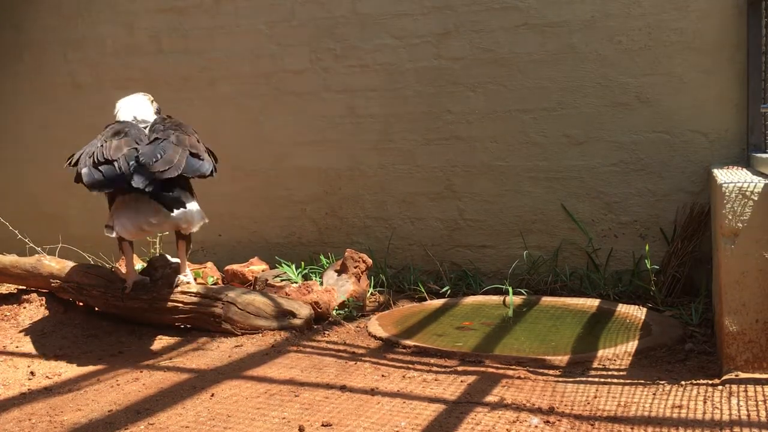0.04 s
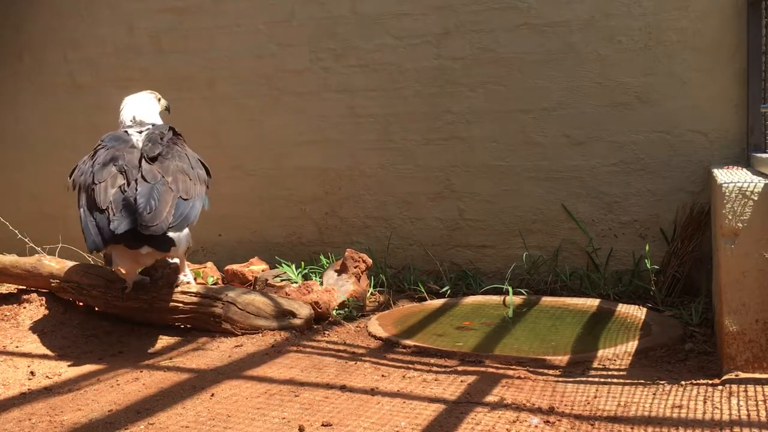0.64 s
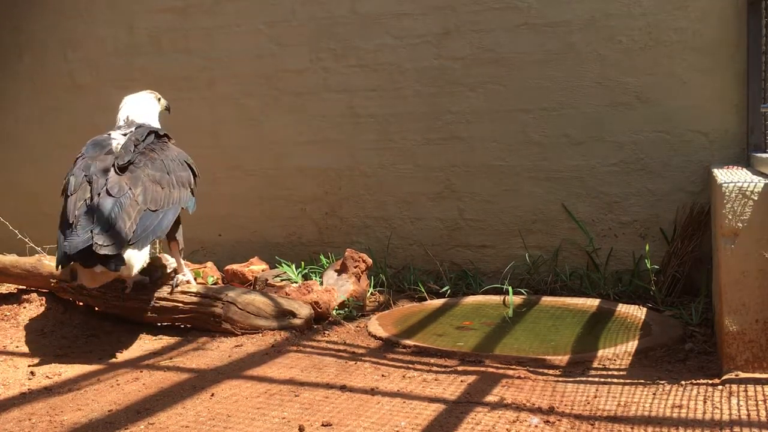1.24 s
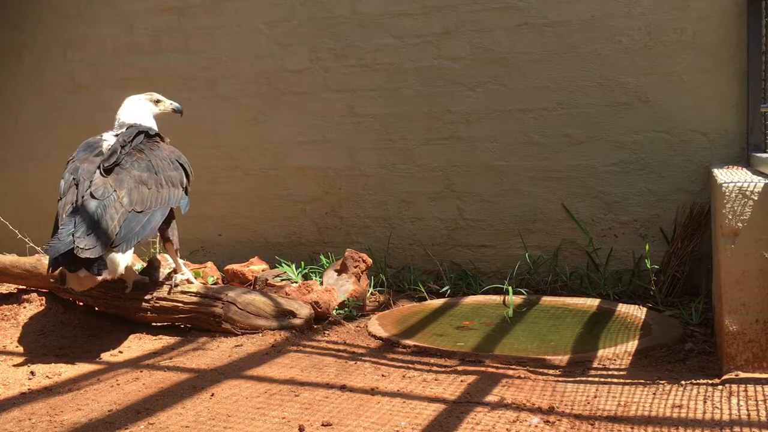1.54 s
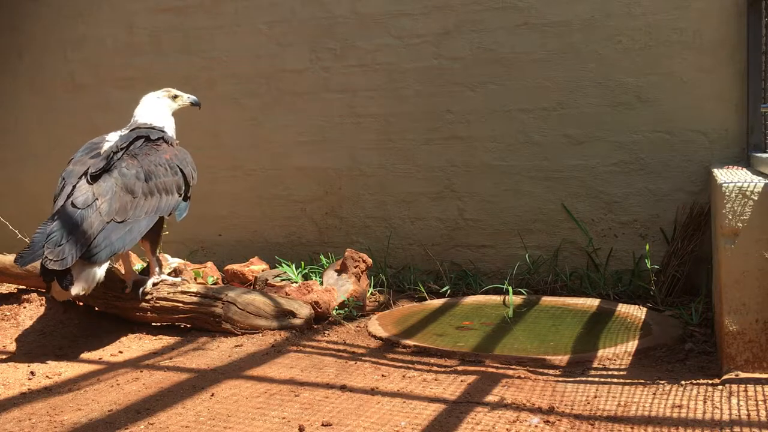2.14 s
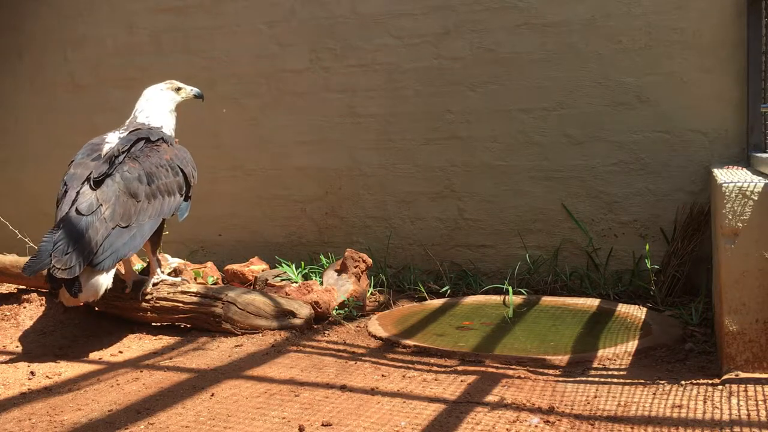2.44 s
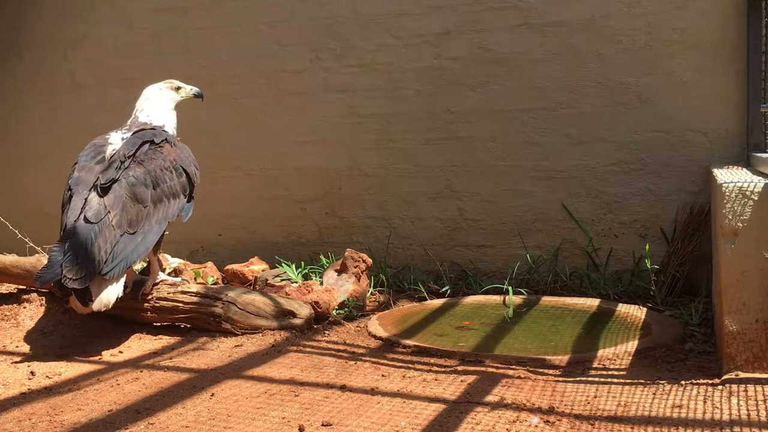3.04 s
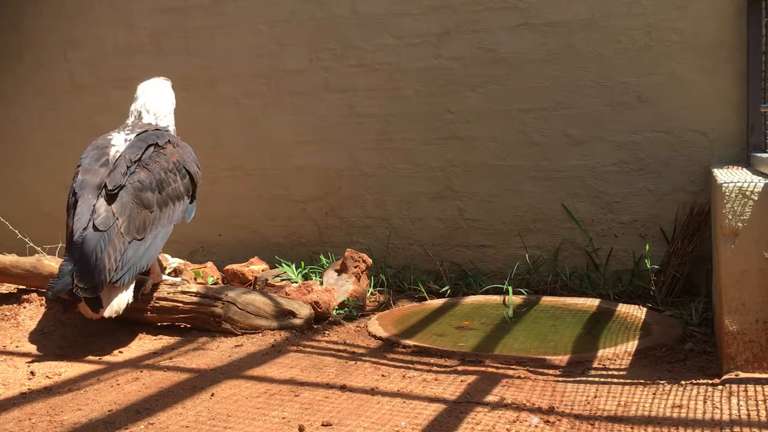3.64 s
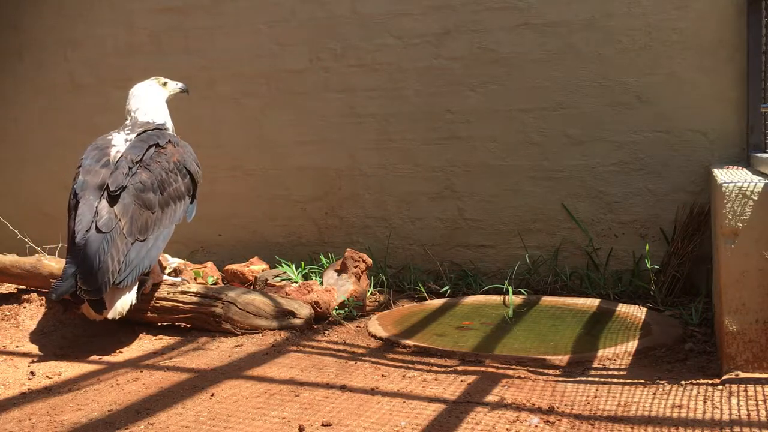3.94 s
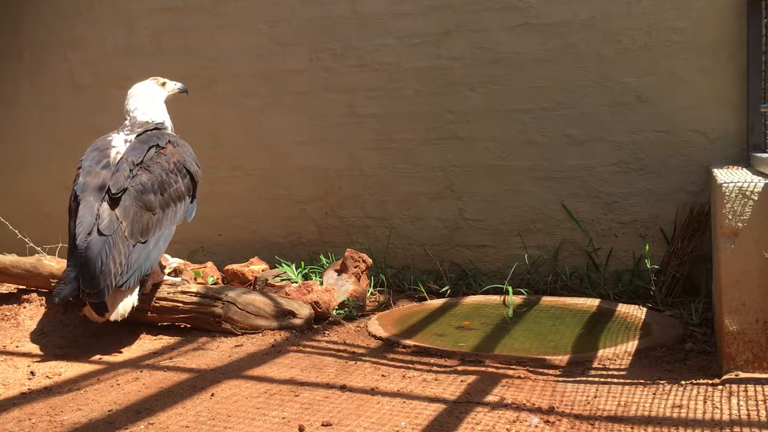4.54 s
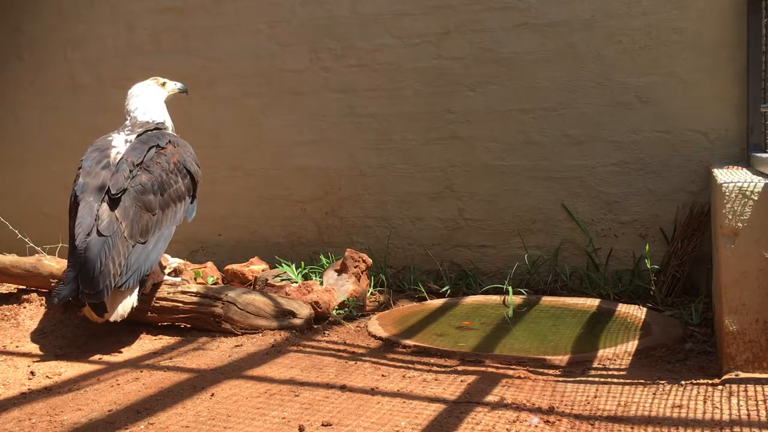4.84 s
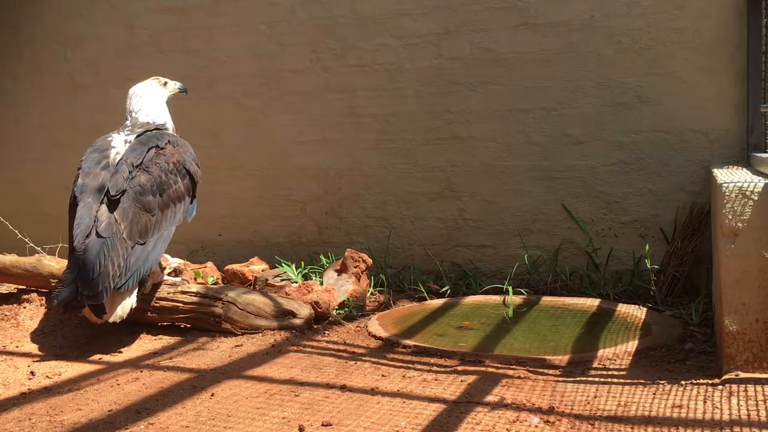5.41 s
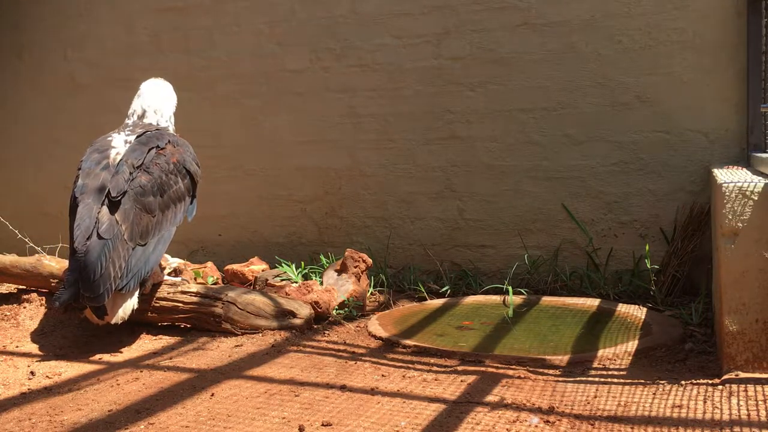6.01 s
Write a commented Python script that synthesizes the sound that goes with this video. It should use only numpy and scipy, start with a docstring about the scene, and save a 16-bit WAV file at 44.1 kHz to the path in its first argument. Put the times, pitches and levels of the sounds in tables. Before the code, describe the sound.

Cicadas shrill steadily throughout in an outdoor aviary. At first, low puffs of wind rumble on the microphone, feathers brush faintly, and a bird gives a short rasp among scattered chirps. From about halfway, a nearby bird repeats a falling whistle, a high twitter and a fast plunging note, each call slapping back off the walls. Other birds call faintly farther away, over a faint distant motor hum.

```python
"""Aviary on a hot day

Cicadas shrill steadily in the trees, their drums clicking into ringing bodies. A bird close by repeats
a slow falling whistle, a high twitter and a fast plunge; others call farther off, and the walls throw
every call back. A motor hums in the distance. At first a large bird settles its feathers and puffs
of air rumble on the microphone."""
import sys
import numpy as np
from scipy import signal
from scipy.fft import rfft, irfft
from scipy.io import wavfile

SR = 44100
rng = np.random.default_rng(int(sys.argv[2]) if len(sys.argv) > 2 else 0)


def unload_audio(sound):
    """Save the sound as a 16-bit wav file, at the path given as the first command line argument."""
    columns = np.transpose(np.atleast_2d(sound))
    # keep every value between -1 and 1, then stretch to whole-number steps
    steps = np.round(np.clip(columns, -1, 1) * 32767)
    wavfile.write(sys.argv[1], SR, steps.astype(np.int16))


N = 276507
TIME = np.arange(N) / SR


def from_db(db):
    """Decibels to gain."""
    return 10 ** (np.asarray(db) / 20)


def rms_one(x):
    """Scale to unit rms."""
    return x / np.sqrt(np.mean(x ** 2) + 1e-20)


def along(curve, x):
    """Read a two-column breakpoint curve at x."""
    return np.interp(x, *np.transpose(curve))


def clock(length_s):
    """Seconds since the start of a call."""
    return np.arange(int(length_s * SR)) / SR


def drift(rate_hz):
    """Smooth random modulation, rms 1."""
    hz = np.fft.rfftfreq(N, 1 / SR)
    return rms_one(irfft(rfft(rng.standard_normal(N)) / (1 + (hz / rate_hz) ** 2), N))


def noise(colour):
    """Noise shaped by an EQ curve, rms 1."""
    hz, db = np.transpose(colour)
    gain = from_db(np.interp(np.log(np.fft.rfftfreq(N, 1 / SR) + 1), np.log(hz), db))
    return rms_one(irfft(rfft(rng.standard_normal(N)) * gain, N))


def sing(calls, overtones_db, waver, waver_hz, flicker_db, fade_s=0.0044):
    """A bird's voice: each call (t/s, f/Hz, level/dB) is a tone roughened in pitch and level."""
    out = np.zeros(N)
    quaver = 1 + waver * drift(waver_hz)
    flicker = flicker_db * drift(74)
    for start, hz, db in calls:
        t = np.arange(len(hz)) / SR
        phase = 2 * np.pi * np.cumsum(hz * np.interp(start + t, TIME, quaver)) / SR
        gate = np.sin(np.pi / 2 * np.clip(np.minimum(t, t[-1] - t) / fade_s, 0, 1)) ** 2
        overtones = sum(from_db(level) * np.sin(k * phase) for k, level in enumerate(overtones_db, 2))
        gain = np.sqrt(2) * from_db(db + np.interp(start + t, TIME, flicker))
        voice = gain * gate * (np.sin(phase) + overtones)
        out += np.interp(TIME, start + t, voice, left=0, right=0)
    return out


# EQ of the outdoor air: f/Hz, relative level/dB
AIR_COLOUR = [(15, -28), (28, -33), (42, -0.5), (75, -2.5), (140, -3.5), (210, -9.5), (310, -15.5),
              (500, -22.5), (900, -27), (2000, -29.5), (3500, -21), (12500, -25.5), (15500, -23.5)]
def air(level_db=-61):
    """A steady bed of low rumble and faint hiss."""
    return from_db(level_db) * noise(AIR_COLOUR)


# partials of the motor's hum: f/Hz, level/dB
MOTOR_PARTIALS = [(93.2, -75), (124.3, -82), (186.2, -75), (279, -85.5)]
def motor(waver=0.00815, flicker_db=2.5):
    """A distant hum that wavers on its way through the air."""
    warped_time = np.cumsum(1 + waver * drift(3.4)) / SR
    return sum(np.sqrt(2) * from_db(db + flicker_db * drift(4)) * np.sin(2 * np.pi * hz * warped_time)
               for hz, db in MOTOR_PARTIALS)


# EQ of brushing feathers: f/Hz, relative level/dB
FEATHER_COLOUR = [(200, -10), (550, 2), (1300, 1), (2500, -27), (6000, -21)]
def feathers(until_s=1.3, release_s=0.18, level_db=-77, uneven_db=2.0):
    """A large bird settles on its perch: soft, uneven brushing that fades once it is still."""
    envelope = np.clip(1 - (TIME - until_s) / release_s, 0, 1)
    return envelope * from_db(level_db + uneven_db * drift(16)) * noise(FEATHER_COLOUR)


# EQ of the wind rumble: f/Hz, relative level/dB
RUMBLE_COLOUR = [(15, -17), (30, 0), (45, 5), (90, -4), (140, -23), (300, -41)]
# puffs of air: peak t/s, half length/s, level/dB
AIR_PUFFS = [(0.006, 0.1, -51.5), (.23, 0.16, -58), (.39, 0.038, -48), (0.522, .042, -44.5),
             (1.14, 0.052, -57.5)]
def puffs():
    """Each puff of air on the microphone swells and sinks as a low rumble."""
    power = sum(from_db(db) ** 2 * np.exp(-2 * ((TIME - peak_s) / half_s) ** 2)
                for peak_s, half_s, db in AIR_PUFFS)
    return np.sqrt(power) * noise(RUMBLE_COLOUR)


def tymbal(clicks_hz, jitter):
    """One cicada's drum buckles in a nearly even train of clicks, at its own pace around clicks_hz."""
    count = int(2 * clicks_hz * N / SR)
    gaps = np.abs(1 + jitter * rng.standard_normal(count)) / (clicks_hz * rng.uniform(.7, 1.3))
    hits = (np.cumsum(gaps) * SR).astype(int)
    hits = hits[hits < N]
    return np.bincount(hits, rng.standard_normal(len(hits)), N)


def resonate(x, hz, width_hz):
    """A resonance with steep skirts: two equal band-pass stages."""
    r = np.exp(-np.pi * width_hz / SR)
    stage = [1 - r, 0, r - 1, 1, -2 * r * np.cos(2 * np.pi * hz / SR), r * r]
    return signal.sosfilt([stage, stage], x + 1e-18)


# resonances of the cicadas' drums and bodies: f/Hz, stage width/Hz, level/dB
CICADA_RESONANCES = [(4461, 934, -47), (4567, 450, -52.5), (5348, 980, -49.5), (6240, 1500, -57.5),
                     (7690, 2170, -56), (8690, 690, -58.5), (9240, 180, -64.5), (9690, 640, -61),
                     (10710, 700, -71)]
def cicadas(insects=14, wander_db=0.24, wander_hz=4, low_cut_hz=3200):
    """Many insects drive each resonance; their clicks blur into one steady shrill."""
    chorus = 0
    for hz, width_hz, db in CICADA_RESONANCES:
        clicks = sum(tymbal(clicks_hz=420.2, jitter=.15) for _ in range(insects))
        chorus += from_db(db) * rms_one(resonate(clicks, hz, width_hz))
    chorus = signal.sosfilt(signal.butter(4, low_cut_hz, "high", fs=SR, output="sos"), chorus)
    return chorus * from_db(wander_db * drift(wander_hz))


def honk(start_s=4.7, length_s=.22, first_hz=588, rise_hz=43.37, end_db=-78.5, swell_db=1):
    """A distant fowl: pitch and level climb a little through one reedy call."""
    progress = clock(length_s) / length_s
    call = (start_s, first_hz + rise_hz * progress, end_db - swell_db * (1 - progress))
    return sing([call], overtones_db=[-7, -8], waver=0.018, waver_hz=170, flicker_db=5.0)


# notes of distant birds: t/s, length/s, first f/Hz, last f/Hz, level/dB
DISTANT_NOTES = [(.46, 0.064, 2340, 2650, -68), (.585, 0.093, 2510, 2320, -62.5),
                 (1.18, 0.587, 3096, 3115, -78.5), (2.076, 0.12, 2385, 2550, -65.5),
                 (2.182, 0.052, 1800, 2214, -67), (2.665, 0.054, 2420, 2360, -73),
                 (3.237, 0.071, 2020, 2020, -78), (5.617, 0.047, 3000, 2920, -66)]
def distant_birds():
    """Faint, plain notes, each a straight glide."""
    calls = [(start, first_hz + (last_hz - first_hz) * clock(length) / length, db)
             for start, length, first_hz, last_hz, db in DISTANT_NOTES]
    return sing(calls, overtones_db=[-30], waver=0.02, waver_hz=170, flicker_db=-3.0)


# EQ of the churr: f/Hz, relative level/dB
RASP_COLOUR = [(1700, -47), (2300, 2.5), (2800, -4.5), (3600, 5.5), (4500, 0), (6000, -42)]
def churr(start_s=.38, attack_s=0.059, hold_s=0.15, release_s=0.15, level_db=-56.5):
    """A bird's harsh rasp: a band of noise chopped into fast, uneven pulses."""
    pulses_hz, depth = 72, 0.66
    phase = 2 * np.pi * np.cumsum(pulses_hz * (1 + 0.106 * drift(20))) / SR
    envelope = np.interp(TIME, np.cumsum([start_s, attack_s, hold_s, release_s]), [0, 1, 1, 0])
    return from_db(level_db) * envelope * noise(RASP_COLOUR) * (1 + depth * np.sin(phase))


# the whistle's loudness along its fall: f/Hz, gain/dB
WHISTLE_GAIN = [(1450, -18), (1750, -8), (2150, -6), (2480, 4), (2800, -4.5), (3200, -1)]
# slow whistles: t/s, length/s, S-curve top f/Hz, S-curve floor f/Hz, steepest after/s,
# fall time constant/s, scoop depth/Hz, base level/dB
WHISTLE_CUES = [(3.182, 0.3, 3570, 1496, 0.12, 0.063, 42, -60.5),
                (3.867, 0.31, 3114, 1570, .17, 0.041, 65, -57.5),
                (4.606, 0.27, 3226, 1517, .18, .043, 304, -53.5),
                (5.445, .225, 3110, 1463, 0.11, 0.037, 22, -59.5)]
def whistles(scoop_s=0.0257, break_hz=2280, half_step_hz=109.5, break_width_hz=64):
    """The near bird starts slightly flat, then slides down an S-curve with one small break."""
    calls = []
    for start, length, top_hz, floor_hz, steepest_s, fall_s, scoop_hz, db in WHISTLE_CUES:
        t = clock(length)
        hz = floor_hz + (top_hz - floor_hz) / (1 + np.exp((t - steepest_s) / fall_s))
        hz -= scoop_hz * np.exp(-t / scoop_s)
        hz += half_step_hz * np.tanh((hz - break_hz) / break_width_hz)  # drops quickly past break_hz
        calls.append((start, hz, db + along(WHISTLE_GAIN, hz)))
    return sing(calls, overtones_db=[-28], waver=0.018, waver_hz=200, flicker_db=1.5)


# contour of one twitter: t/s from its start, f/Hz, gain/dB
TWITTER_CONTOUR = [(0, 5700, -14), (.017, 6110, -9), (.035, 5716, -0.5), (.057, 5507, 1), (.064, 7310, -6),
                   (.08, 7650, -11.5), (.096, 7250, -6.5), (.104, 5510, -2), (0.126, 5320, -5)]
# high twitters: t/s, pitch ratio, base level/dB
TWITTER_CUES = [(3.44, .99, -46.5), (4.158, 0.99, -42.5), (4.96, 1.01, -43)]
def twitters():
    """The near bird repeats a sagging note with one upward hop, a shade higher or lower."""
    times, pitches, gains = np.transpose(sorted(map(tuple, TWITTER_CONTOUR)))
    t = clock(times[-1])
    hz, gain_db = np.interp(t, times, pitches), np.interp(t, times, gains)
    calls = [(start, ratio * hz, db + gain_db) for start, ratio, db in TWITTER_CUES]
    return sing(calls, overtones_db=[-13], waver=0.0198, waver_hz=300, flicker_db=2.5)


# the plunge's loudness along its fall: f/Hz, gain/dB
PLUNGE_GAIN = [(950, -29.5), (1400, -17.5), (1900, -12), (2350, 0.5), (3000, -1.5), (4500, 10.5)]
# fast plunges: t/s, length/s, top f/Hz, resting f/Hz, fall time constant/s, base level/dB
PLUNGE_CUES = [(0.103, 0.18, 4590, 900, 0.042, -55), (0.173, 0.057, 4300, 1307, 0.041, -65),
               (0.598, 0.12, 2736, 1050, 0.032, -53.5), (1.685, 0.091, 1764, 1118, 0.051, -60),
               (2.219, 0.078, 2530, 1200, 0.046, -58), (2.885, 0.11, 3630, 869, 0.038, -56),
               (3.576, 0.11, 4334, 1005, 0.042, -51), (4.296, 0.12, 4750, 792, 0.044, -47.5),
               (4.371, 0.18, 3820, 797, 0.063, -54.5), (5.097, 0.16, 4876, 827, 0.053, -46.5),
               (6.01, 0.099, 3500, 1013, 0.05, -54)]
def plunges():
    """The near bird's pitch dives towards its resting value while the voice dies away."""
    calls = []
    for start, length, top_hz, rest_hz, fall_s, db in PLUNGE_CUES:
        hz = rest_hz + (top_hz - rest_hz) * np.exp(-clock(length) / fall_s)
        calls.append((start, hz, db + along(PLUNGE_GAIN, hz)))
    return sing(calls, overtones_db=[-22, -22], waver=0.0536, waver_hz=345, flicker_db=0.0)


# early reflections off the walls: delay/s, gain/dB
WALL_ECHOES = [(.0035, -12.5), (.0235, -0.5), (0.032, -3.5), (.049, -18)]
def walls(x, tail_db=-5, t60_s=0.62, build_s=0.028, high_cut_hz=6000):
    """The direct sound, a few hard slaps off the walls, then a short, darker scattered tail."""
    echoes = sum(from_db(db) * np.interp(TIME - delay, TIME, x, left=0) for delay, db in WALL_ECHOES)
    t = TIME[:SR]
    tail = rng.standard_normal(SR) * from_db(-60 * t / t60_s) * (1 - np.exp(-t / build_s))
    tail = signal.sosfilt(signal.butter(1, high_cut_hz, fs=SR, output="sos"), tail / np.linalg.norm(tail))
    return x + echoes + from_db(tail_db) * signal.fftconvolve(x, tail)[:N]


def scene():
    """A mono mix on both channels; only the bird calls feed the wall reverb."""
    bed = air() + motor() + cicadas()
    birds = whistles() + twitters() + plunges() + distant_birds() + honk() + churr()
    mono = bed + walls(birds) + feathers() + puffs()
    return np.array([mono, mono])


def record(dry, notch_hz=10420, notch_width_hz=420, high_cut_hz=15780):
    """The microphone has a narrow notch in the treble; a steep filter cuts the top."""
    notched = signal.lfilter(*signal.iirnotch(notch_hz, notch_hz / notch_width_hz, fs=SR), dry)
    return signal.sosfilt(signal.ellip(12, .1, 70, high_cut_hz, fs=SR, output="sos"), notched)


dry = scene()
out = record(dry)
unload_audio(out)
```